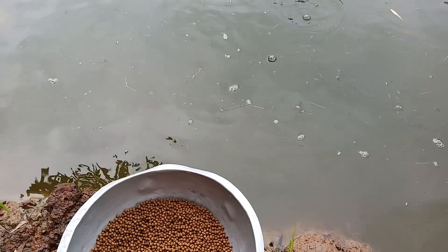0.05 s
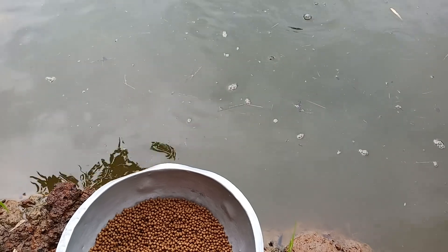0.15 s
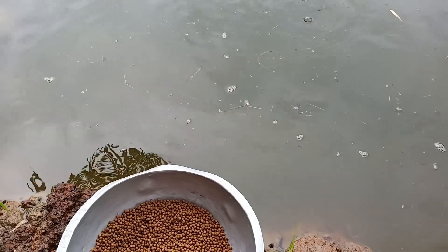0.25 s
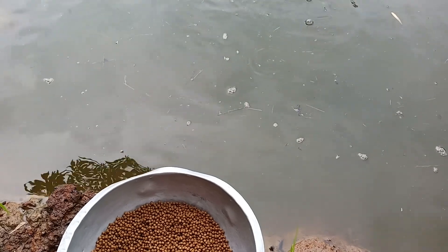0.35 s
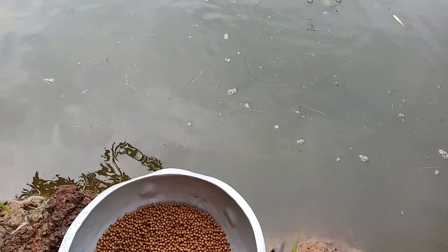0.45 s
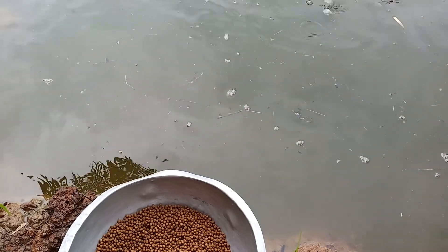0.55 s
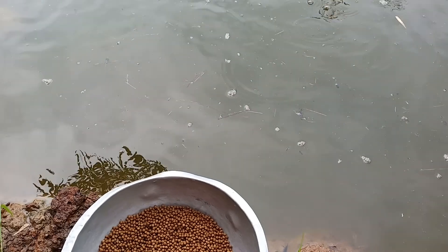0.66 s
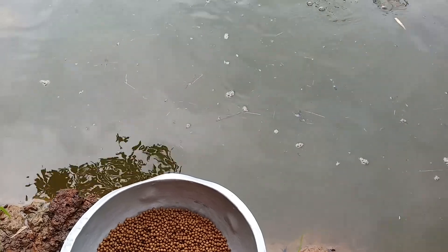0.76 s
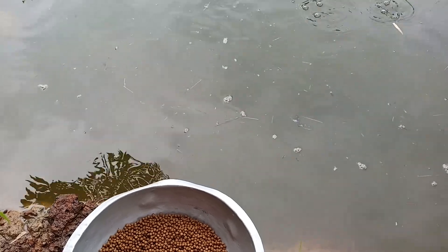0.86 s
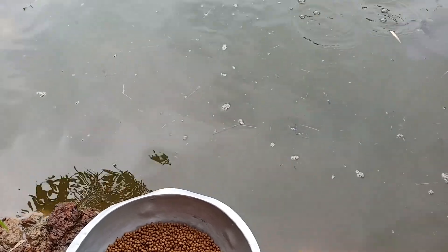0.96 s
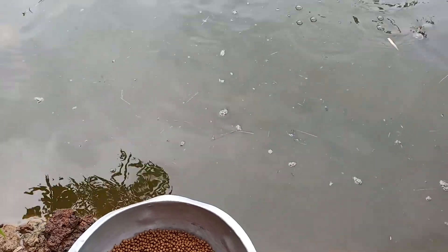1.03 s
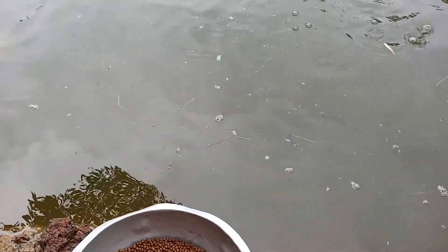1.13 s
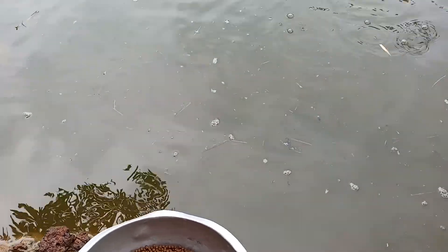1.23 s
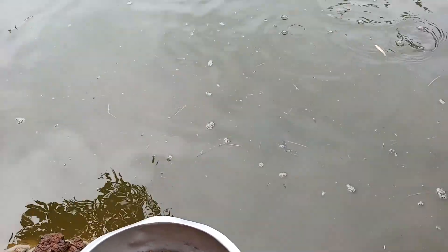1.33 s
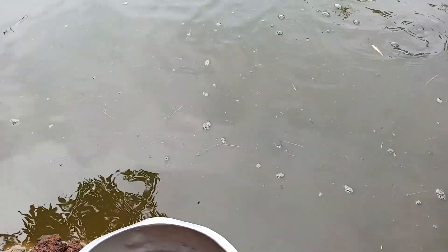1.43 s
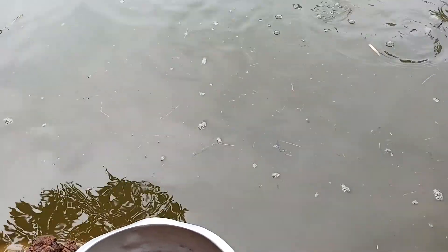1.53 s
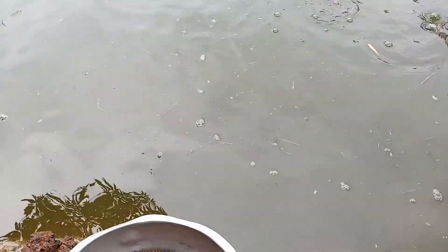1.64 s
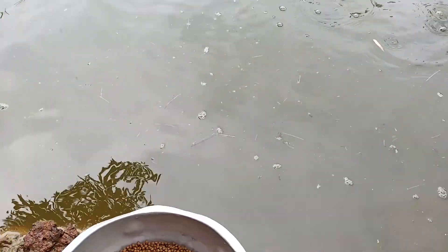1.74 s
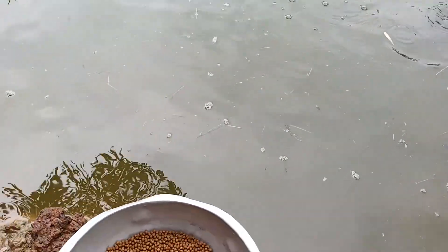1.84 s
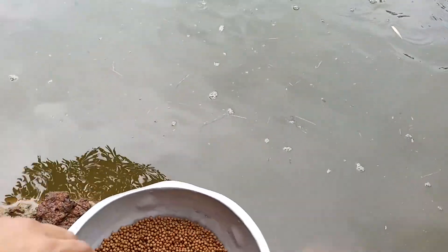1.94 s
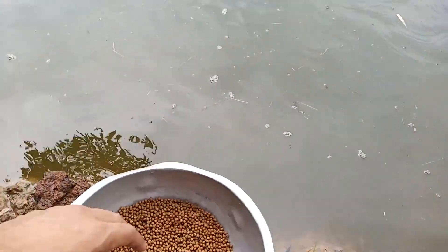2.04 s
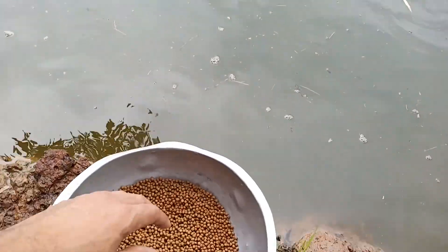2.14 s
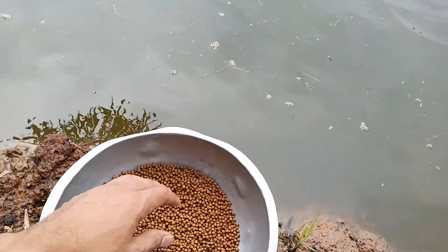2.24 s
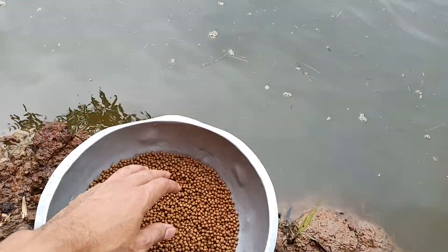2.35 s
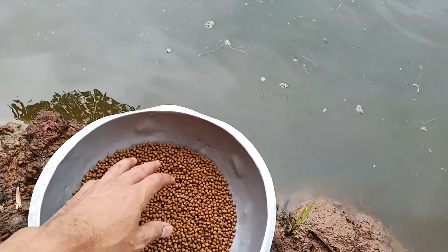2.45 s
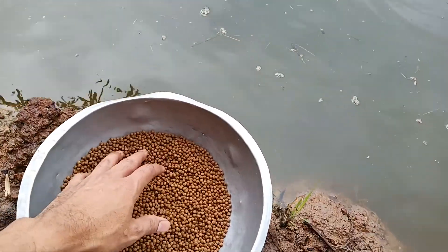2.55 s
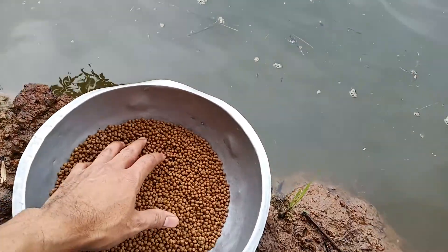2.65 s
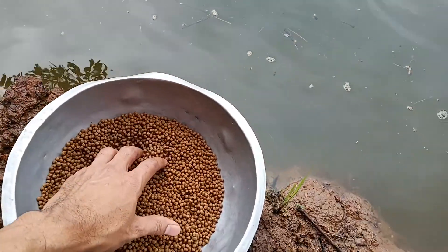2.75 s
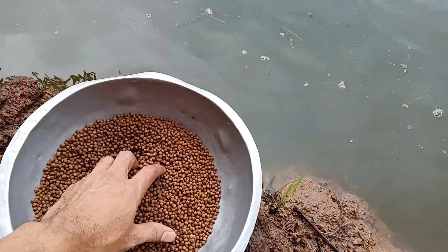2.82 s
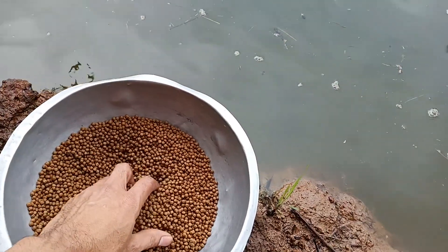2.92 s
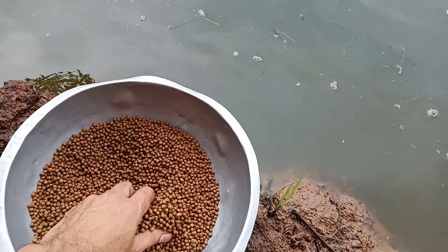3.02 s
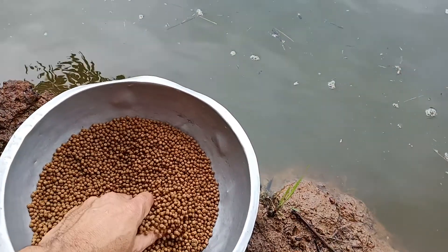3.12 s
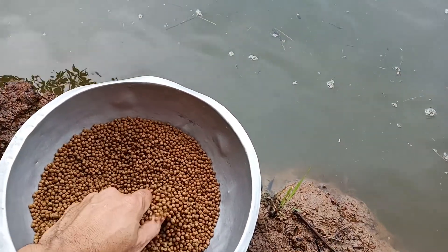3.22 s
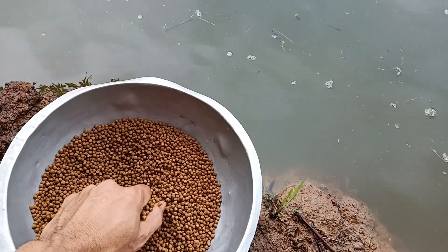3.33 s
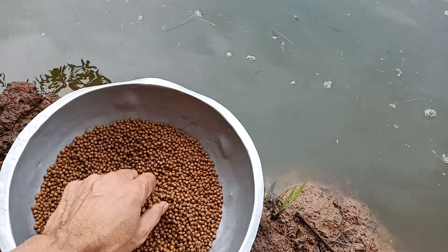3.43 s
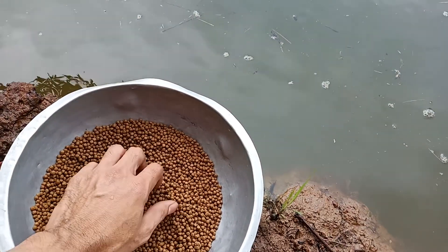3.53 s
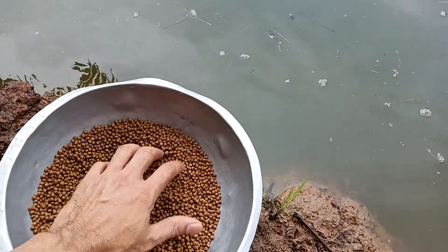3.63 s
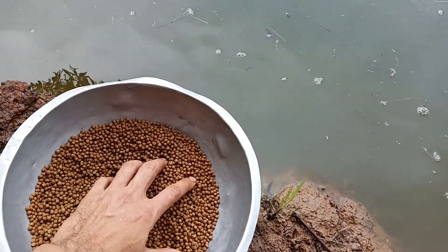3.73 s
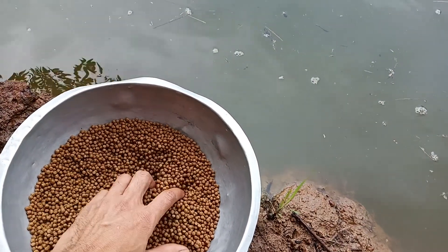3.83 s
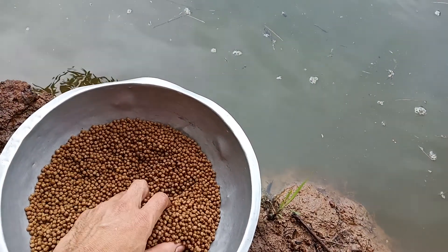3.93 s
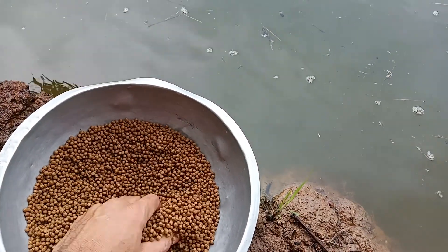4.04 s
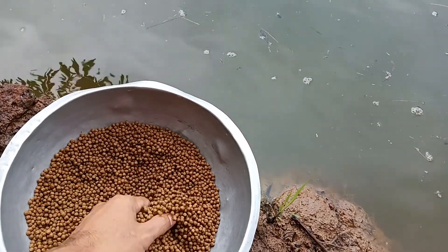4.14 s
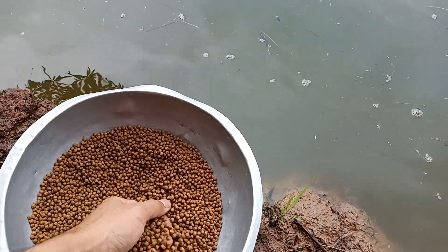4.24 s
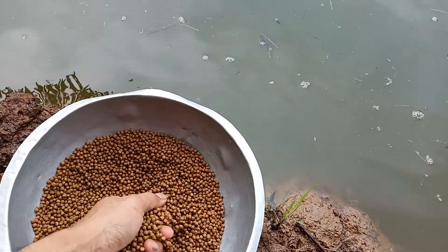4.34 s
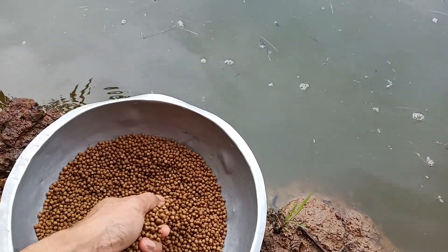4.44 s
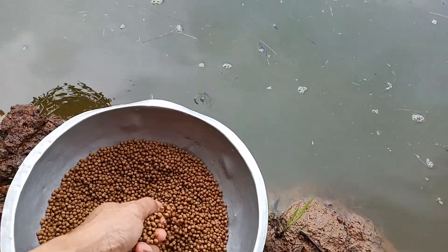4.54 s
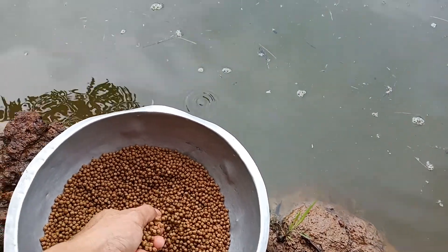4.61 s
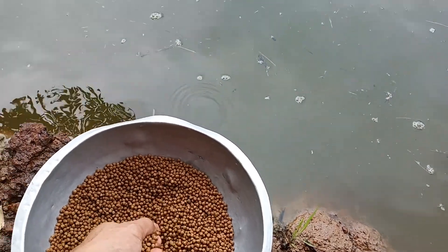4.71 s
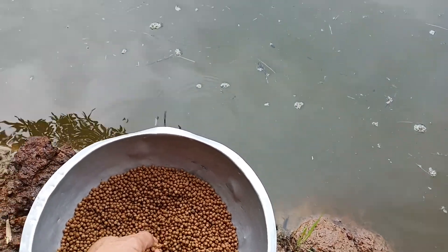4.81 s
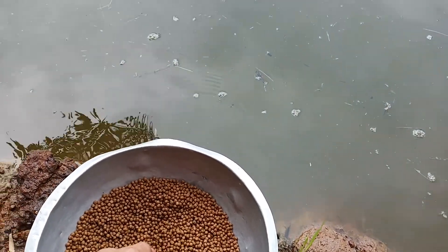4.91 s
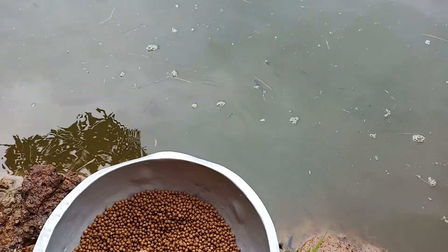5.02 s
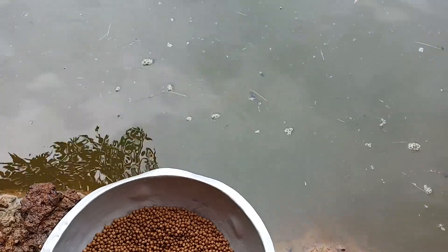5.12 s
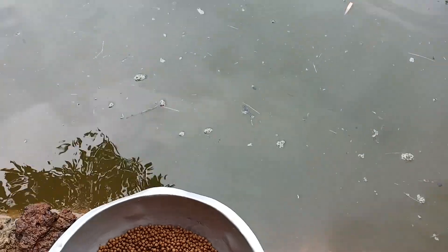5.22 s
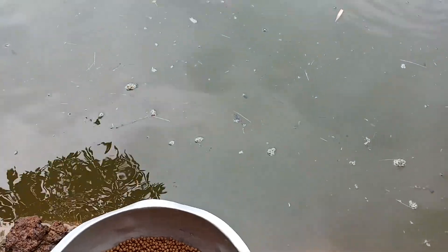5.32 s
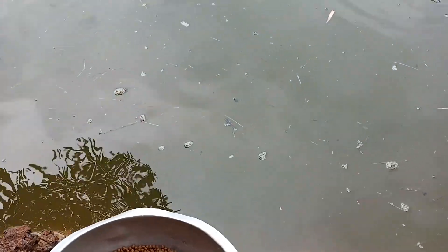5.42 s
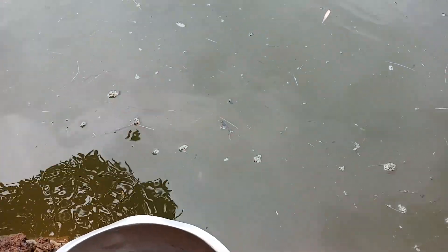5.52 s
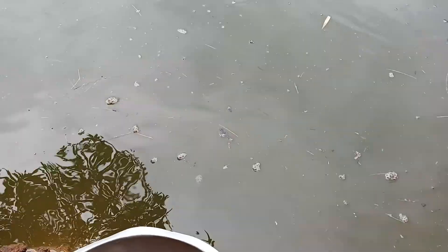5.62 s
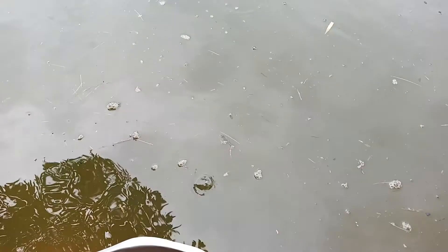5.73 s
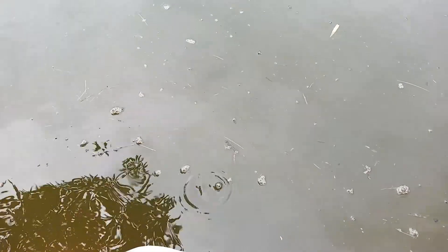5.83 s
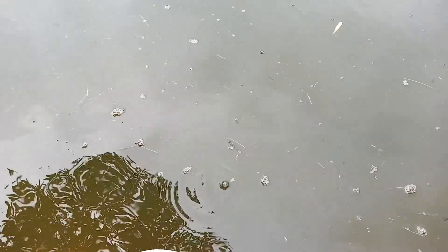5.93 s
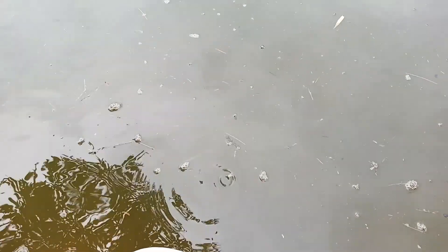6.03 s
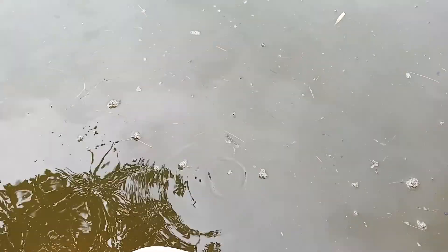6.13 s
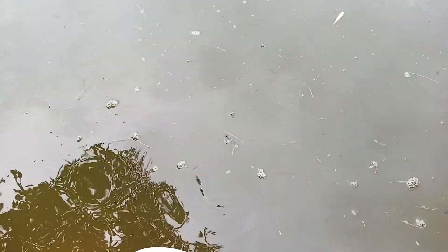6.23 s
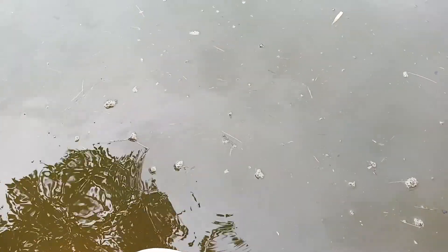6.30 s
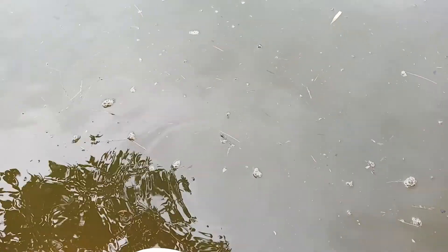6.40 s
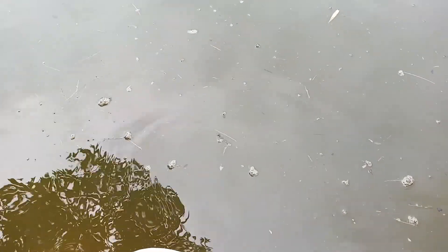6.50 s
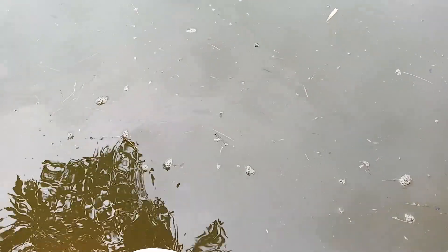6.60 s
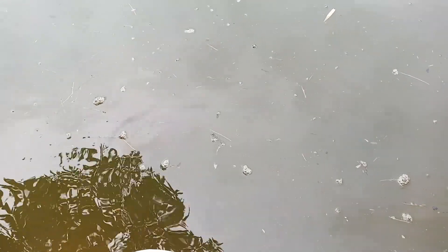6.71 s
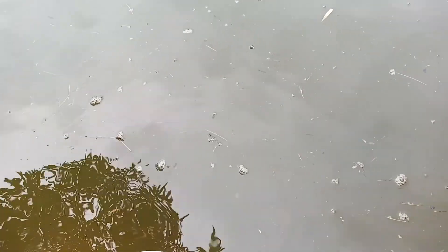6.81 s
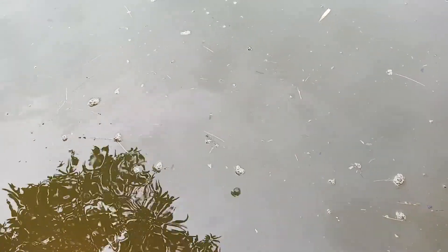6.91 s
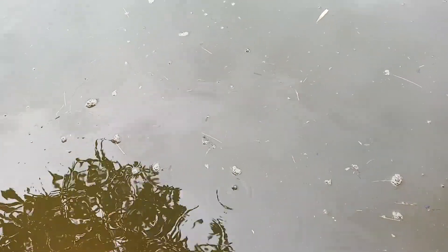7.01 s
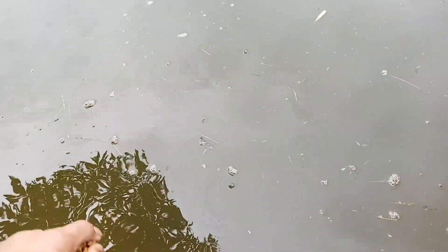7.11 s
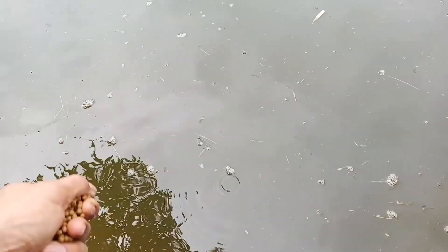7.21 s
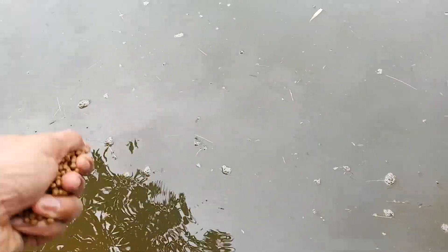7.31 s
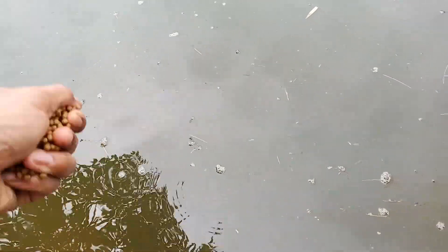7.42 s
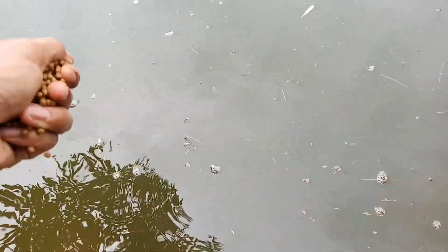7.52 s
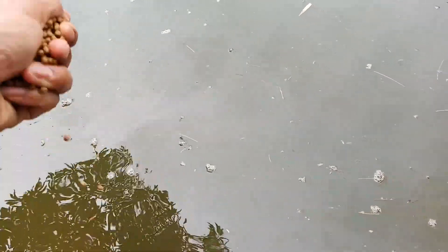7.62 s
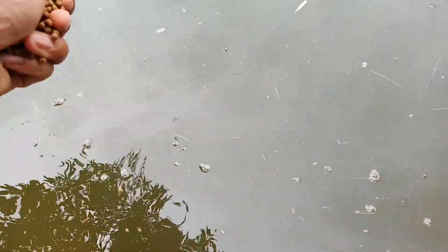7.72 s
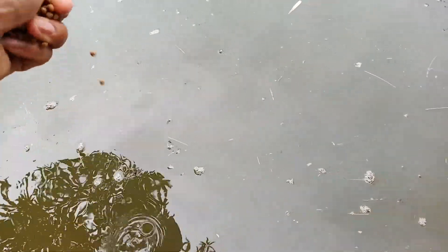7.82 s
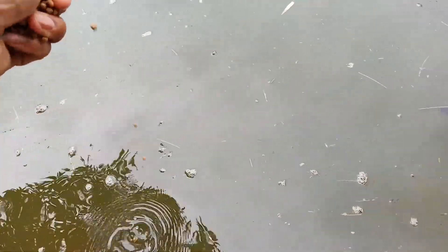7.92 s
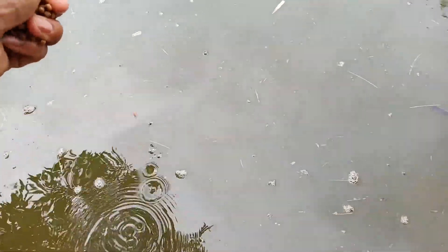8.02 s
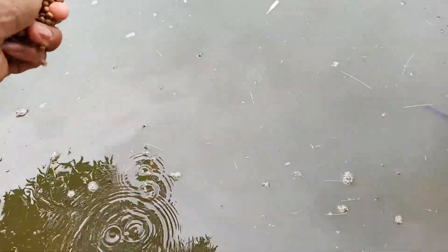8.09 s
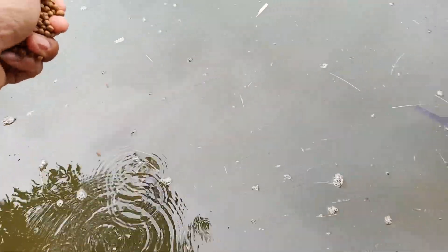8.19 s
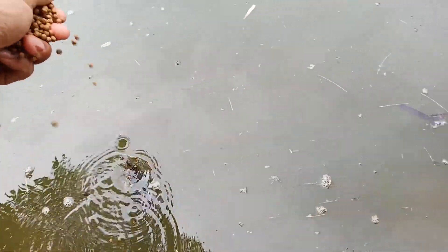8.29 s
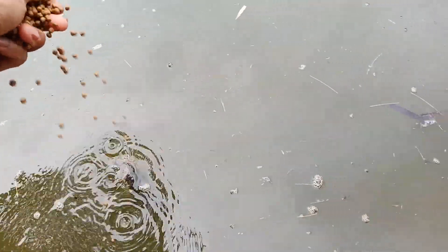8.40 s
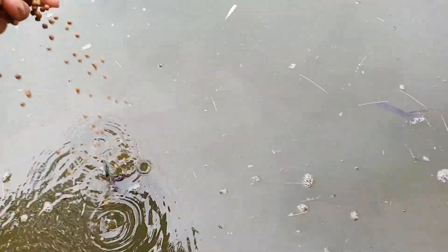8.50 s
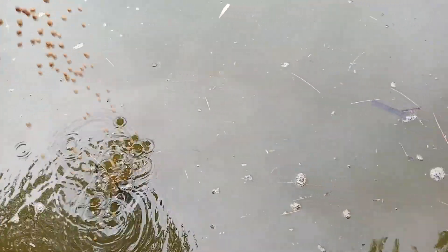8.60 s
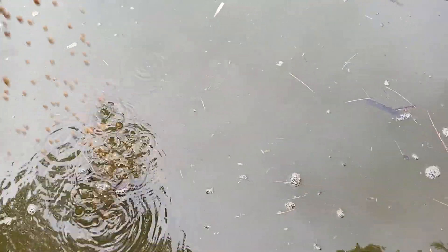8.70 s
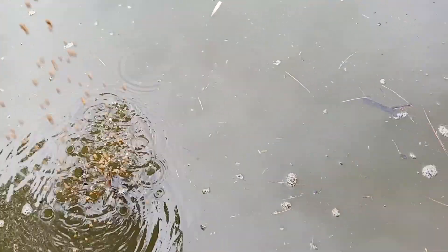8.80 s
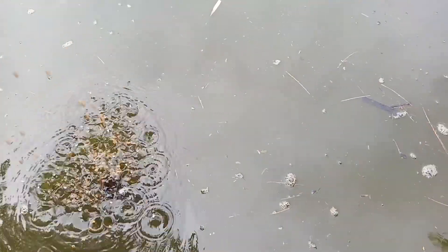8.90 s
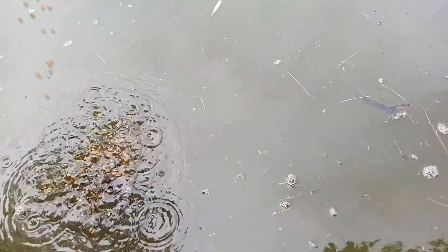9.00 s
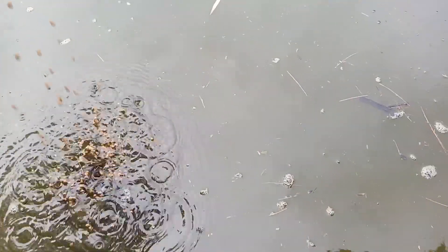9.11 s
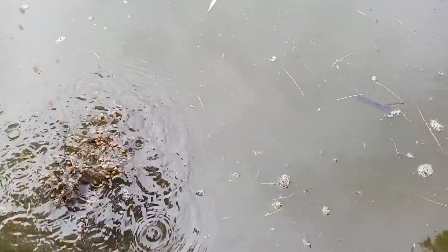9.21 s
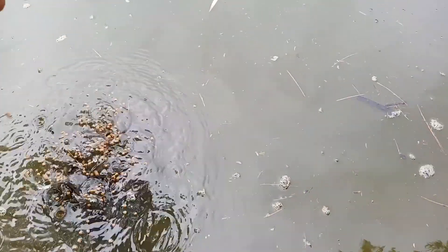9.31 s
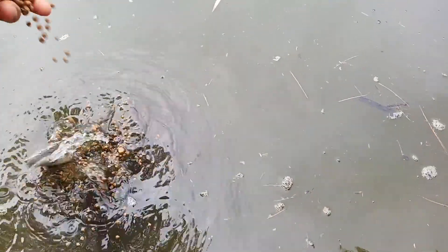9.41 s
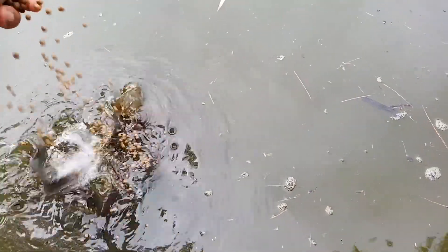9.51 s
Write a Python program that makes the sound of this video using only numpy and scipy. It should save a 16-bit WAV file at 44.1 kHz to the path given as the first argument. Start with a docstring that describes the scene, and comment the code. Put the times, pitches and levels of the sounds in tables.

```python
"""On the bank of a pond, young catfish are fed while a one-cylinder diesel idles some way off.
A hand digs through a basin of dry pellets, whose collisions are random impulses exciting resonators.
A handful then patters on the water; the fish slap it (noise bursts) and gulp (air bubbles ringing).
The engine is a train of exhaust thuds and rattling noise, under a steady hiss and an early thin whine."""
import sys
import numpy as np
from scipy import signal
from scipy.fft import rfft, irfft
from scipy.io import wavfile
from scipy.ndimage import uniform_filter1d

SR = 44100
rng = np.random.default_rng(int(sys.argv[2]) if len(sys.argv) > 2 else 0)


def log_audio(samples):
    """Write samples as a 16-bit WAV file to the path given in sys.argv[1]."""
    # one column per channel
    frames = np.atleast_2d(samples).T
    # limit to full scale, then quantise
    limited = np.clip(frames, -1, 1)
    pcm = np.round(limited * 32767).astype(np.int16)
    wavfile.write(sys.argv[1], SR, pcm)


N = 421155
TIME = np.arange(N) / SR

# Levels in the tables are relative: each source applies its own gain. Spectra give level per Hz.
# strokes of the hand through the basin:
# (t/s, sliding heap level/dB, single clicks level/dB, rise/s, end of push after t/s, fade/(dB/s))
HAND_STROKES = [(2.555, -47.5, -31.5, 0.025, 0.19, 100), (2.659, -28, -28, 0.071, 0.37, 112.5),
                (3.201, -50, -48, 0.027, 0.32, 100), (3.47, -36.5, -40, 0.025, 0.029, 126),
                (3.673, -28, -24, 0.12, 0.3, 49.5), (4.449, -58.5, -68, 0.015, 0.031, 90),
                (4.742, -58.5, -67, 0.014, 0.19, 56)]
# spectrum of the sliding pellets (f/Hz, level/dB)
HEAP_SPECTRUM = [(250, -38), (400, -48), (460, -26), (520, -25.5), (680, -13.5), (1200, -12.5),
                 (1500, -8.5), (2300, -9.5), (2700, -6.5), (3700, -2.5), (5050, -9), (6700, -1),
                 (9000, -8.5), (12000, -14.5), (15500, -10.5)]
# spectrum of the coarse knocks of tumbling pellets (f/Hz, level/dB)
KNOCK_SPECTRUM = [(400, -22), (680, -19), (1100, -12), (1500, -16), (2300, 4), (3600, 5), (5000, -4),
                  (6700, 9), (9000, -25), (12000, 3), (15500, 24)]
# modes of the basin's wall under the heap (f/Hz, level/dB, t60/s)
WALL_MODES = [(723, -10, 0.076), (1097, -7.5, 0.051), (1650, -9, .04), (2205, 1, 0.018), (2970, -1, 0.064),
              (3650, -16, 0.033), (4210, 1.5, 0.055)]
# loudest single pellets knocking together in the hand
# (t/s, peak level/dB, ring f/Hz, brightness of the crack 0-1)
PELLET_CLICKS = [(2.5619, -9, 6420, 0.2), (2.866, 1, 6760, 0), (3.094, -9, 6650, 0.1),
                 (3.115, -15, 6670, .3), (3.165, -22, 6900, .3), (3.1794, -10, 7550, 0.4),
                 (3.198, -11, 6860, .5), (3.207, -14, 6400, 0.1), (3.227, -12.5, 7350, .3),
                 (3.267, -27, 6600, .4), (3.2945, -7, 6740, 0.4), (3.322, -20, 2970, 0),
                 (3.3517, -4, 7040, 0.08), (3.423, -24, 6700, .3), (3.479, -23, 3140, 0.1),
                 (3.503, -10, 7000, 0.34), (3.542, -19, 6000, 0.1), (3.555, -17, 5400, 0),
                 (3.629, -24, 6600, 0.15), (3.683, -19, 6540, 0.2), (4.178, -8, 6860, 0),
                 (4.236, -16, 6860, 0.3), (4.281, -12, 6700, 0.33), (4.3068, -13.5, 4320, 0.4),
                 (4.3085, -14, 5900, 0.5), (4.312, -16, 5100, 0.5), (4.3405, -19, 7360, .5),
                 (4.388, -23, 3860, .3), (4.418, -30, 9050, 0.1), (4.456, -19, 6440, 0.7),
                 (4.484, -25, 3300, 0.5), (4.601, -23.5, 6700, 0.7), (4.7182, -26, 6660, 0.37),
                 (4.7516, -35, 2560, 0.2), (4.76, -28, 6850, 0.2), (4.8484, -39, 2700, 0),
                 (4.891, -16, 3750, .05), (4.8915, -27, 6200, 0.2), (4.9302, -27, 7500, 0.52),
                 (5.0434, -30, 3510, 0.13), (5.9577, -27, 6520, 1), (6.178, -31, 3000, 0),
                 (7.771, -23.5, 6440, 0.72), (8.2985, -26, 6400, 0.4), (8.3247, -23, 6680, 0.5)]
# loudest pellets and flung droplets hitting the water
# (t/s, peak level/dB, ring f/Hz, brightness of the crack 0-1)
WATER_HITS = [(8.4503, -23, 6660, 0.5), (8.4941, -27, 6920, 0.5), (8.566, -19, 6800, 0.8),
              (8.5959, -16, 5700, 0.3), (8.6085, -11.5, 6540, 1), (8.6234, -19, 6600, 0.8),
              (8.6657, -13, 6300, 0.6), (8.712, -6.5, 6400, 0.25), (8.7381, -18, 6620, .3),
              (8.746, -30, 5930, 0.3), (8.7712, -17, 6800, 0.6), (8.8014, -18, 6970, 0.2),
              (8.8209, -14, 7000, 0.3), (8.8558, -18, 7030, .4), (8.8832, -29.5, 7000, .3),
              (8.9014, -21, 6700, 0.6), (8.91, -21, 6200, 0.5), (8.9204, -16, 6960, .6),
              (8.9514, -21, 6600, .4), (8.9715, -17.5, 7000, 0.5), (9.001, -39, 7050, .4),
              (9.1463, -18.5, 6250, 0.3), (9.2017, -24, 6550, 0.5), (9.2825, -14, 6900, 0.4),
              (9.3089, 1.5, 6700, 0), (9.3636, -10.5, 6000, 0.34), (9.3844, -10.5, 6550, 0),
              (9.392, -24, 7250, .2), (9.4362, -10, 7400, 0.5), (9.4405, -10, 7300, .15),
              (9.4745, -9, 6600, 0), (9.484, -11, 6700, 0.1), (9.4975, -12, 7300, .05),
              (9.512, -19, 6600, 0.1), (9.5415, -15, 6700, 0.6)]
# spectrum of a small hard impact (f/Hz, level/dB)
TICK_SPECTRUM = [(500, -56), (1500, -50), (3500, -12), (5000, -11), (6700, 3.5), (8500, -8.5), (11500, -15),
                 (15500, -14.5)]
# spectrum of a bright crack (f/Hz, level/dB)
CRACK_SPECTRUM = [(1500, -41), (5000, -20), (7000, 9.5), (11000, 1), (15500, 2)]
# pellets shifting in the closed fist (t/s, level/dB)
FIST_LEVEL = [(4.25, -51), (4.5, -60), (4.75, -56), (4.86, -76), (5.1, -56.5), (5.5, -60.5), (5.9, -57.5),
              (6.4, -58.5), (7.2, -56.5), (8.0, -51.5), (8.4, -54.5)]
# spectrum of the rustle in the fist (f/Hz, level/dB)
RUSTLE_SPECTRUM = [(2000, -50), (7000, 4.5), (12000, -11.0), (15500, -7.0)]
# pellets and droplets raining on the pond (t/s, level/dB)
PATTER_LEVEL = [(8.35, -59.5), (8.5, -49.5), (8.794, -42), (8.92, -41.5), (9.0, -52.5), (9.198, -43.5),
                (9.332, -44), (9.41, -46), (9.458, -39.5), (9.55, -41)]
# tails and mouths slapping the surface (t/s, peak level/dB, spray t60/s, depth of the plunge 0-1)
SURFACE_SLAPS = [(8.6085, -20, 0.03, 0.5), (9.142, -47, 0.01, 0), (9.174, -24, 0.027, .1),
                 (9.2276, -22, 0.017, .03), (9.247, -24.5, 0.025, 0.2), (9.2615, -18, 0.015, 0.2),
                 (9.271, -16.5, 0.042, .7), (9.2777, -20.5, 0.028, 0.8), (9.3011, -13.5, 0.032, 0.67),
                 (9.331, -28, 0.01, 0.7), (9.413, -23, 0.02, 0.3), (9.4468, -30, 0.0091, 0.2),
                 (9.4637, -8, 0.012, 0), (9.483, -17, 0.035, .5), (9.4906, -18, 0.019, 0.9),
                 (9.498, -18, 0.028, 0.7), (9.512, -14.5, 0.023, 0.4), (9.539, -28, .03, 0.5)]
# spectrum of spray (f/Hz, level/dB)
SPRAY_SPECTRUM = [(88, -55.5), (150, -22), (352, -32.5), (445, -24), (751, -13.5), (948, -18), (1630, -9.5),
                  (2500, -16.5), (2700, -12.5), (5330, -13), (6730, -7.5), (8490, -16.5), (11800, -19),
                  (15500, -15.5)]
# spectrum of the shove of water under a deep slap (f/Hz, level/dB)
PLUNGE_SPECTRUM = [(110, -12), (220, -0.5), (330, 2.5), (480, 0), (750, 4.5), (1400, -9), (4000, -45)]
# biggest air pockets left by gulps and slaps
# (t/s, peak level/dB, starting f/Hz, ring t60/s, climb of pitch/(Hz/s))
AIR_POCKETS = [(8.501, -44.5, 700, 0.05, 3000), (8.523, -40, 1660, 0.032, 30000),
               (8.608, -16, 3270, 0.018, 5000), (8.609, -17, 3650, 0.016, 10000),
               (8.616, -35, 1620, 0.036, 5000), (8.666, -27, 1090, 0.065, 37600),
               (8.677, -39, 1660, 0.027, 20000), (8.679, -37, 1160, 0.025, 15000),
               (8.69, -30, 1350, 0.025, 15000), (8.715, -38, 1500, .04, 20000),
               (8.784, -37, 3180, 0.033, 8000), (8.803, -19.5, 5130, 0.014, 20000),
               (8.826, -42, 1900, .04, 15000), (8.862, -47, 1114, 0.093, 2000),
               (8.874, -32.5, 1650, 0.021, 50000), (8.883, -29, 3950, 0.012, 20000),
               (8.93, -49, 3330, 0.02, 8000), (8.951, -37, 1820, 0.037, 5000), (8.97, -44, 1550, .04, 8000),
               (9.04, -31.5, 1420, 0.024, 60300), (9.042, -29, 2040, 0.013, 30300),
               (9.067, -35, 5850, .022, 12000), (9.086, -41, 4300, 0.036, 8000),
               (9.127, -35, 3240, 0.033, 4070), (9.142, -32, 1230, 0.031, 40000),
               (9.143, -22.5, 2000, 0.015, 15000), (9.175, -34.5, 580, 0.031, 15000),
               (9.18, -27, 1210, 0.018, 15000), (9.202, -35, 1030, 0.028, 10000),
               (9.203, -38, 610, .025, 10000), (9.2285, -19, 1650, 0.012, 20000),
               (9.249, -33, 1560, .025, 10000), (9.273, -21, 1950, 0.028, 6000),
               (9.276, -33, 790, 0.02, 10000), (9.279, -30, 1420, 0.017, 10000),
               (9.292, -25, 1470, 0.022, 10000), (9.3045, -18, 4970, 0.011, 10000),
               (9.312, -27, 1150, .035, 5000), (9.343, -33, 1120, .03, 5000),
               (9.358, -23.5, 814, 0.035, 22100), (9.365, -27, 1060, .035, 8000),
               (9.379, -31, 1950, 0.03, 10000), (9.386, -27, 1920, .028, 18000),
               (9.3945, -22, 5600, 0.017, 45000), (9.397, -30, 2250, 0.029, 12000),
               (9.406, -27, 1490, 0.056, 14000), (9.4127, -9.5, 4070, 0.008, 16000),
               (9.428, -28, 2120, 0.018, 25000), (9.449, -28, 3930, .016, 10000),
               (9.464, -12, 2010, 0.019, 6000), (9.4845, -25, 1200, 0.02, 15000),
               (9.492, -23, 2650, .014, 10000), (9.498, -22, 1580, .014, 10000),
               (9.502, -22, 3630, .012, 20000), (9.504, -14, 4700, .012, 20000),
               (9.513, -15, 2030, .022, 5000), (9.5185, -13.5, 1370, 0.021, 25000),
               (9.52, -19, 1910, .018, 10000), (9.523, -25, 4500, 0.013, 30000),
               (9.526, -22, 2530, 0.021, 10000), (9.532, -26, 3850, .014, 10000),
               (9.539, -26, 1080, .044, 20000)]
# water churned by the shoal (t/s, level/dB)
CHURN_LEVEL = [(8.45, -64), (8.649, -56.5), (9.0, -71), (9.15, -52), (9.23, -44), (9.28, -41), (9.341, -41),
               (9.41, -37.5), (9.455, -46), (9.5, -24), (9.55, -36.5)]
# spectrum of the sloshing broken surface (f/Hz, level/dB)
WASH_SPECTRUM = [(150, -21), (350, -15), (700, -12), (1300, 3), (2100, -13), (3000, -5), (5000, -7),
                 (6700, -2), (9000, -24), (15500, -24)]
# faint soft puffs and stirs; the one at 6.48 s is a fish's swirl (t/s, level/dB, end of hold after t/s)
FAINT_STIRS = [(4.453, -60, 0.064), (4.606, -57.5, 0.016), (4.87, -61, .05), (5.35, -66, 0.12),
               (5.58, -65, 0.035), (6.17, -62, .03), (6.48, -53, 0.058), (6.615, -73, .04),
               (7.55, -73, .04), (7.77, -72, 0.031)]
# spectrum of a faint stir (f/Hz, level/dB)
STIR_SPECTRUM = [(300, -29), (550, -14), (750, -6.5), (1000, -7.5), (1300, -8), (3000, -3.5), (8000, -48)]
# low rumble of the throw (t/s, level/dB)
RUMBLE_LEVEL = [(8.55, -67), (8.62, -43), (8.68, -45.5), (8.77, -48.5), (8.84, -62), (8.89, -50.5),
                (8.98, -50), (9.02, -68), (9.07, -52), (9.1, -75)]
# spectrum of the rumble (f/Hz, level/dB)
RUMBLE_SPECTRUM = [(25, -28), (70, 1.5), (120, -5.0), (250, -27.0), (900, -87)]
# engine clatter reaching the bank (t/s, level/dB, depth of its throb 0-1)
CLATTER_LEVEL = [(0, -48, 0.7), (.8, -47.5, 0.8), (1.95, -53, 0.85), (2.9, -55, 1), (4.3, -51, 0.6),
                 (5.2, -56, 0.2), (5.6, -53.5, 0.5), (6.2, -51.5, 0.5), (6.8, -52.5, 0.5), (7.3, -51, 0.75),
                 (7.65, -56.5, 0.3), (8.3, -62.5, 0.25)]
# spectrum of the clatter (f/Hz, level/dB)
CLATTER_SPECTRUM = [(400, -28.5), (700, -27.5), (1200, -19), (1450, -9.5), (1700, -10), (2300, -2.5),
                    (3700, -2), (4900, -8), (6700, 2), (9000, -8.5), (12000, -19.5), (15500, -51)]
# spectrum of the engine's clank (f/Hz, level/dB)
CLANK_SPECTRUM = [(900, -29.5), (1250, -13), (1450, 4), (1750, -9.5), (2100, 3), (2800, -22), (6000, -48)]
# idle speed, hunting slowly up and down (t/s, firing rate f/Hz)
FIRING_RATE = [(0, 11.73), (1.84, 10.28), (2.96, 11.5), (3.19, 10.55), (4.86, 11.52), (6.84, 9.72),
               (8.32, 11.7), (9.02, 10.6)]
# exhaust reaching the bank (t/s, level/dB)
EXHAUST_CURVE = [(0, -51), (.3, -48.5), (.58, -55.5), (.78, -49.5), (1.12, -54.5), (1.28, -54), (1.55, -51),
                 (1.85, -56), (2.1, -52.5), (2.65, -58), (3.02, -52), (3.4, -60.5), (3.85, -54.5),
                 (4.2, -61.5), (4.75, -59), (5.15, -55), (5.5, -57.5), (5.75, -50.5), (6.05, -55.5),
                 (6.42, -59.5), (6.6, -49.5), (6.72, -59.5), (6.86, -52), (7.05, -56), (7.25, -55.5),
                 (7.5, -58), (7.7, -56), (8.15, -60.5), (8.5, -59.5)]
# modes set booming in the exhaust (f/Hz, level/dB)
BOOM_MODES = [(78, -4), (115, 0), (162, -3.5)]
# spectrum of the puffs of gas (f/Hz, level/dB)
GAS_SPECTRUM = [(25, -26), (45, -18), (70, -3.5), (125, 1.5), (175, 1.5), (235, -3.5), (400, -24),
                (560, -18), (800, -24), (1500, -32)]
# reflections from the water, the bank and the basin (delay/s, wander of the delay/s, strength)
SHORT_ECHOES = [(.00135, 0.00032, 0.14), (.0022, 0.00029, 0.3), (.0029, .0003, 0.2)]
# spectrum of the steady hiss (f/Hz, level/dB)
HISS_SPECTRUM = [(180, -16), (300, -14), (450, -34.5), (1120, -27.5), (1440, -17.5), (2360, -7.5),
                 (4000, -7.5), (4800, -11), (5570, -9.5), (6700, 0), (8200, -10), (10400, -17),
                 (12000, -25), (15500, -21)]
# faint high whine that fades early (t/s, level/dB)
WHINE_LEVEL = [(0, -51.5), (.4, -57), (.7, -54.5), (.8, -60), (1.1, -75), (1.4, -100)]

HEAP_SAG_DB_PER_S, CLICK_SAG_DB_PER_S = 12.5, 8.5   # a stroke eases off while it pushes
TRICKLE = 1.45   # loose pellets keep tumbling this many times as long as the push
JERK_DB, JERK_RATE_HZ = 1.0, 16   # the heap gives way unevenly
HAND_ECHO_S, HAND_WANDER_S, HAND_ECHO_SHARE = .0011, .00015, .3   # bounce off the moving hand
CRACK_S, CLICK_RING_S, DROP_RING_S = .005, .01, .007   # t60 of a crack, a dry pellet, a drop
THUD_S = 0.064   # median length of an exhaust thud
THUD_SPREAD_DB, THUD_PITCH_SPREAD = 2.5, 0.0976   # between firings; the pitch spread is a share
WHINE_HZ, WHINE_SAG_HZ_PER_S = 2380, 48
CUTOFF_HZ = 15800


def basin():
    """Granular collision: digging effort raises the impact rate; knocks, wall modes and clicks join in."""
    heap_db, click_db = digging()
    effort = from_db(heap_db - heap_db.max())
    heap_db = heap_db + JERK_DB * drift(JERK_RATE_HZ)
    collisions = grains(per_s=1500 + 6500 * effort, spread_db=1.1)
    heap = collisions * from_db(heap_db + 2.0 + 0.74 * drift(46))
    heap = 1.08 * heap + .9 * pings(heap, 593.4, 15330, cycles=51, count=40)
    tumbles = grains(per_s=260 + 480 * effort, spread_db=1.2) * from_db(heap_db - 3.5)
    knocks = pings(tumbles, 600, 7500, cycles=26, count=30) + .4 * tumbles
    loose = grains(per_s=1500 + 2500 * effort, spread_db=.8)
    clicks = loose * from_db(click_db - 8.5 + 2.1 * drift(54))
    body = colour(heap, HEAP_SPECTRUM) + colour(knocks, KNOCK_SPECTRUM)
    body = body + from_db(-18.5) * basin_wall(heap)
    echo_time = TIME - HAND_ECHO_S - HAND_WANDER_S * drift(2.53)
    body = body + HAND_ECHO_SHARE * np.interp(echo_time, TIME, body)
    return body + colour(pings(clicks, 4940, 10260, cycles=25, count=16), TICK_SPECTRUM)


def digging():
    """Superposed powers: strokes swell, push and fade, clicks outlasting the heap; returns both in dB."""
    heap, clicks = np.zeros(N), np.zeros(N)
    for s, heap_db, click_db, rise_s, push_s, fade_db_per_s in HAND_STROKES:
        t = np.maximum(TIME - s, 0)
        swell = np.minimum(t / rise_s, 1)
        sliding = np.minimum(t, push_s)
        tumbling = np.minimum(t, TRICKLE * push_s)
        stroke_db = heap_db - HEAP_SAG_DB_PER_S * sliding - fade_db_per_s * (t - sliding)
        loose_db = click_db - CLICK_SAG_DB_PER_S * tumbling - fade_db_per_s * (t - tumbling)
        heap += (swell * from_db(stroke_db)) ** 2
        clicks += (swell * from_db(loose_db)) ** 2
    return 10 * np.log10(heap + 1e-12), 10 * np.log10(clicks + 1e-12)


def basin_wall(x):
    """Modal resonance: the heap excites the metal wall's damped modes."""
    out = np.zeros(N)
    for hz, db, t60 in WALL_MODES:
        r = from_db(-60 / (t60 * SR))
        poles = [1, -2 * r * np.cos(2 * np.pi * hz / SR), r * r]
        out += from_db(db) * np.sqrt(1 - r) * signal.lfilter([1, 0, -1], poles, x + 1e-18)
    return rms_one(out) * np.std(x)


def ticks():
    """Impact excitation: each hit rings briefly and crackles as decaying noise; bright hits also crack."""
    crackles, cracks, rings, t = np.zeros(N), np.zeros(N), np.zeros(N), TIME[:SR // 30]
    for hits, ring_s, ring_db in ((PELLET_CLICKS, CLICK_RING_S, -8), (WATER_HITS, DROP_RING_S, -6)):
        noises = rng.standard_normal((len(hits), 2, len(t)))
        for (s, db, hz, bright), (crackle, crack) in zip(hits, noises):
            add(crackles, s + 0.001194, from_db(db - 20.5 - 60 * t / 0.025) * crackle)
            add(cracks, s + 0.0009, bright * from_db(db - 4.5 - 60 * t / CRACK_S) * crack)
            add(cracks, s + 0.0011, np.array([bright * from_db(db)]))   # a single impulse
            add(rings, s + 0.000972, from_db(db + ring_db) * bubble(hz, ring_s, 0, attack_s=0.00025))
    return colour(crackles, TICK_SPECTRUM) + colour(cracks, CRACK_SPECTRUM) + rings


def fist():
    """Granular friction: the carried handful is dense faint impulses with sparse clicks among them."""
    level_db, = in_time(FIST_LEVEL, outside=-120)
    rustle = colour(grains(per_s=5600, spread_db=1.5), RUSTLE_SPECTRUM)
    clicks = colour(grains(per_s=30, spread_db=2.5), TICK_SPECTRUM)
    return from_db(level_db) * (1.24 * rustle + 0.38 * clicks)


def patter():
    """Random arrivals: pellets and flung droplets land in clumps, each exciting a tiny ping."""
    level_db, = in_time(PATTER_LEVEL, outside=-120)
    clumps_db = 2.5 * drift(45)
    drops = grains(per_s=1200, spread_db=0.0) * from_db(level_db - 1.5 + clumps_db)
    high_pings = pings(drops, 2900, 15600, cycles=34, count=24)
    low_pings = pings(drops, 1600, 7100, cycles=23, count=20)
    impacts = colour(1.18 * drops + .85 * high_pings, TICK_SPECTRUM)
    return impacts + 0.32 * colour(drops, CRACK_SPECTRUM) + .3 * low_pings


def slaps():
    """Surface impact: a smack of noise decays into spray and tiny bubbles; depth adds a low plunge."""
    force, smack, shove, t = np.zeros(N), np.zeros(N), np.zeros(N), TIME[:SR // 6]
    for s, db, t60, depth in SURFACE_SLAPS:
        add(force, s + 0.00024, from_db(db - 60 * t / t60))
        add(smack, s, from_db(db) * burst(rise_s=0.00067, hold_s=0.0014, decay_s=0.00079))
        add(shove, s, depth * from_db(db) * burst(rise_s=0.0014, hold_s=0.0026, decay_s=0.0098))
    droplets = grains(per_s=1900, spread_db=2.0)
    spray = force * droplets + 0.74 * smack * rng.standard_normal(N)
    fizz = pings(force * grains(per_s=1700, spread_db=0.0), 703, 8100, cycles=53, count=24)
    plunge = colour(shove * rng.standard_normal(N), PLUNGE_SPECTRUM)
    return from_db(-7.0) * colour(0.85 * spray + .7 * fizz, SPRAY_SPECTRUM) + from_db(-22) * plunge


def bubbles():
    """Bubble resonance: big single gulps over a swarm of small bubbles whose level follows the churning."""
    gulps, swarm = np.zeros(N), np.zeros(N)
    for s, db, hz, t60, climb in AIR_POCKETS:
        ring = bubble(hz, t60, climb, attack_s=0.0012)
        # the pocket bursts at the surface before it has rung out
        alive = np.exp(-(TIME[:len(ring)] / (1.3 * t60)) ** 4)
        add(gulps, s, from_db(db - 0.5) * ring * alive)
    first, last = CHURN_LEVEL[0][0], CHURN_LEVEL[-1][0]
    for when, size, strength in rng.random(size=(700, 3)):
        hz = 1200 * 4.4 ** size
        ring = bubble(hz, 22 / hz, rise_hz_per_s=37000, attack_s=0.00014)
        add(swarm, first + when * (last - first), from_db(-14 * strength) * ring)
    # a fast random flutter roughens the gulps
    return gulps * from_db(3.0 * drift(260)) + 1.6 * swarm * from_db(in_time(CHURN_LEVEL)[0])


def bubble(hz, t60, rise_hz_per_s, attack_s):
    """Damped oscillation: a sine decays exponentially; a rising pitch marks air nearing the surface."""
    t = TIME[:int(t60 * SR) + 2]
    pitch = hz + rise_hz_per_s * t
    ring = np.sin(2 * np.pi * np.cumsum(pitch) / SR)
    return ring * from_db(-60 * t / t60) * (1 - np.exp(-t / attack_s))


def wash():
    """Turbulent noise: the broken surface sloshes in rough lumps of random impulses."""
    level_db, = in_time(CHURN_LEVEL, outside=-120)
    lumps, lumps_db = grains(per_s=1200, spread_db=2.2), 3.5 * drift(70)
    return from_db(level_db - 3.5 + lumps_db) * colour(lumps, WASH_SPECTRUM)


def stirs():
    """Enveloped noise: faint soft puffs and stirs, one of them a fish's swirl, are filtered noise bursts."""
    envelope = np.zeros(N)
    for s, db, hold_s in FAINT_STIRS:
        add(envelope, s, from_db(db) * burst(rise_s=0.0072, hold_s=hold_s, decay_s=0.02))
    return colour(envelope * rng.standard_normal(N), STIR_SPECTRUM)


def rumble():
    """Low-frequency noise: a short rumble swells as the handful is thrown."""
    level_db, = in_time(RUMBLE_LEVEL, outside=-120)
    return from_db(level_db) * colour(rng.standard_normal(N), RUMBLE_SPECTRUM)


def engine():
    """Periodic excitation: each firing gives a thud and a burst of clatter and clank, smeared by echoes."""
    starts = firing_times()
    rattles, rattle = np.zeros(N), burst(rise_s=0.011, hold_s=0.022, decay_s=0.03)
    for start, strength_db in zip(starts, rng.standard_normal(len(starts))):
        add(rattles, start - .003, rattle * from_db(strength_db))
    clatter_db, throb = in_time(CLATTER_LEVEL)
    beat = np.sqrt(1 - throb + throb * rms_one(rattles) ** 2)
    knocks = pings(grains(per_s=900, spread_db=.8) * beat, 1400, 4600, cycles=150, count=48)
    clatter = colour(grains(per_s=22000, spread_db=1.4) * beat + 0.33 * knocks, CLATTER_SPECTRUM)
    clank = colour(beat * rng.standard_normal(N), CLANK_SPECTRUM)
    clank = clank * from_db(-15 + 3.4 * drift(6.5))   # it comes and goes
    return exhaust(starts) + from_db(clatter_db + 0.47) * reflected(clatter + clank)


def firing_times():
    """Phase accumulation: the cylinder fires once for each full cycle that its rate adds up to."""
    cycles = np.cumsum(in_time(FIRING_RATE)[0]) / SR
    return np.interp(np.arange(int(cycles[-1]) + 1), cycles, TIME)


def exhaust(starts):
    """Pipe resonance: each firing is a rounded thud in the exhaust's modes, with a soft puff of gas."""
    thuds, puffs, t = np.zeros(N), np.zeros(N), TIME[:SR // 7]
    for start, (loud, long) in zip(starts, rng.standard_normal((len(starts), 2))):
        age = t / (THUD_S * np.exp(.24 * long))
        hump = np.sin(np.pi * np.minimum(age, 1) ** .8) ** 1.3
        swell = from_db(THUD_SPREAD_DB * loud) * hump
        add(puffs, start - .007, swell)
        chances = rng.standard_normal((len(BOOM_MODES), 3))
        for (hz, db), (detune, strength, phase) in zip(BOOM_MODES, chances):
            cycles = hz * np.exp(THUD_PITCH_SPREAD * detune) * t + phase
            add(thuds, start - .007, from_db(db + 2 * strength) * swell * np.sin(2 * np.pi * cycles))
    gas = rms_one(colour(rng.standard_normal(N) * (puffs + 0.69), GAS_SPECTRUM))
    return from_db(in_time(EXHAUST_CURVE)[0]) * (0.96 * rms_one(thuds) + 0.25 * gas)


def air():
    """Stationary noise: a steady bright hiss, with a thin sine whine that sags and wavers at first."""
    pitch = WHINE_HZ - WHINE_SAG_HZ_PER_S * TIME + 5 * drift(12)
    whine_db = in_time(WHINE_LEVEL)[0] + 1.4 * drift(8)
    whine = np.sin(2 * np.pi * np.cumsum(pitch) / SR) * from_db(whine_db)
    hiss = colour(rng.standard_normal(N), HISS_SPECTRUM)
    return from_db(-51.0) * reflected(hiss) + whine


def reflected(x):
    """Comb filtering: short echoes interfere with the sound; the comb shifts as the listener sways."""
    out = x.copy()
    for delay_s, wander_s, strength in SHORT_ECHOES:
        out += strength * np.interp(TIME - delay_s - wander_s * drift(0.808), TIME, x)
    return rms_one(out) * np.std(x)


def pings(clicks, low_hz, high_hz, cycles, count):
    """Resonator bank: each click rings at a pitch dealt by chance; the sum is roughly white in range."""
    dealt, out = rng.integers(0, count, N), np.zeros(N)
    for k, hz in enumerate(np.geomspace(low_hz, high_hz, count)):
        r = from_db(-60 * hz / (cycles * SR))   # 60 dB down after the given cycles
        poles = [1, -2 * r * np.cos(2 * np.pi * hz / SR), r * r]
        out += signal.lfilter([1 - r, 0, r - 1], poles, clicks * (dealt == k) + 1e-18)
    return rms_one(out) * np.std(clicks)


def grains(per_s, spread_db):
    """Shot noise: random impulses of uneven size and sign, with mean power 1 at any rate."""
    sizes_db = spread_db * np.minimum(rng.exponential(1, N), 4)
    sizes = from_db(sizes_db) * rng.choice([-1, 1], N)
    chance = np.clip(per_s / SR, 1e-6, 1)
    return rms_one(sizes) * (rng.random(N) < chance) / np.sqrt(chance)


def burst(rise_s, hold_s, decay_s):
    """Transient envelope: linear rise, hold until hold_s after onset, then exponential decay."""
    t = TIME[:SR // 4]
    return np.minimum(t / rise_s, 1) * np.exp(-np.maximum(t - hold_s, 0) / decay_s)


def drift(rate_hz):
    """Low-pass random process: smooth chance with spread 1, computed at every 40th sample."""
    r = np.exp(-80 * np.pi * rate_hz / SR)
    steps = rng.standard_normal(N // 40 + 2002)
    slow = signal.lfilter([1], [1, -2 * r, r * r], steps)[2000:]   # drop the settling time
    return np.interp(np.arange(N) / 40, np.arange(len(slow)), rms_one(slow))


def colour(x, spectrum):
    """Minimum-phase filtering: a causal filter shapes the spectrum; white noise keeps its power."""
    size = 4096
    hz, db = np.transpose(spectrum)
    grid = np.maximum(np.arange(size // 2 + 1) * SR / size, 1)
    cepstrum = irfft(np.log(from_db(np.interp(np.log(grid), np.log(hz), db))))
    # folding the cepstrum onto positive times makes the phase minimal
    cepstrum[1:size // 2] *= 2
    cepstrum[size // 2 + 1:] = 0
    response = irfft(np.exp(rfft(cepstrum)))
    return signal.oaconvolve(x, response / np.linalg.norm(response))[:N]


def from_db(db):
    """Decibel law: amplitude ratio of a level."""
    return 10 ** (np.asarray(db) / 20)


def rms_one(x):
    """Normalisation: scale to a root mean square of 1."""
    return x / np.sqrt(np.mean(x ** 2) + 1e-20)


def in_time(rows, outside=None):
    """Linear interpolation: each column of a time table at every sample."""
    s, *columns = np.transpose(rows)
    return [np.interp(TIME, s, c, outside, outside) for c in columns]


def add(out, s, sound):
    """Superposition: mix a sound in from a given time on."""
    at = int(np.clip(round(s * SR), 0, N))
    out[at:at + len(sound)] += sound[:N - at]


def scene():
    """Superposition of all sources, alike in both channels; in the open there is no room."""
    feed = basin() + fist() + ticks() + patter()
    water = slaps() + bubbles() + wash()
    mono = feed + water + stirs() + rumble() + engine() + air()
    return np.array([mono, mono])


def record(dry):
    """Band limiting: a steep elliptic low-pass cuts the top."""
    low_pass = signal.ellip(10, .2, 70, CUTOFF_HZ, fs=SR, output="sos")
    return signal.sosfilt(low_pass, dry)


dry = scene()
out = record(dry)
log_audio(out)
```